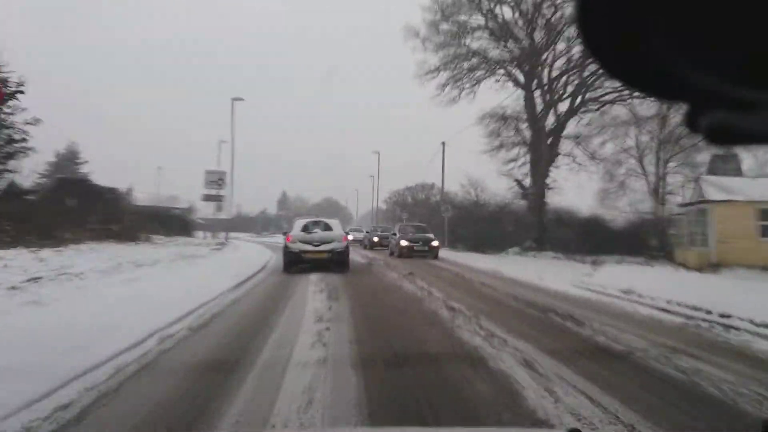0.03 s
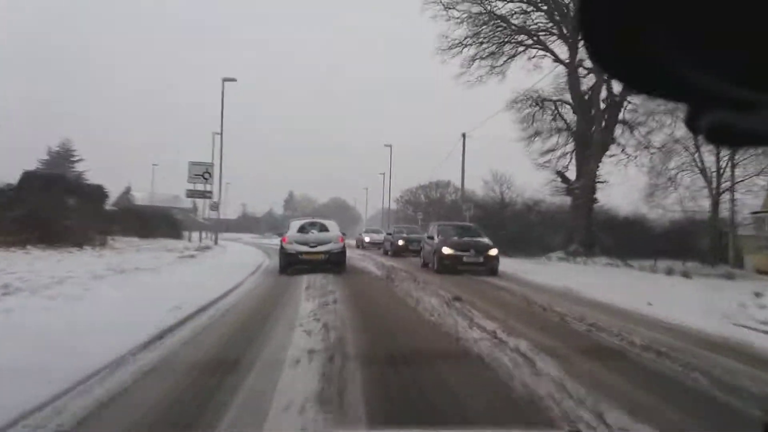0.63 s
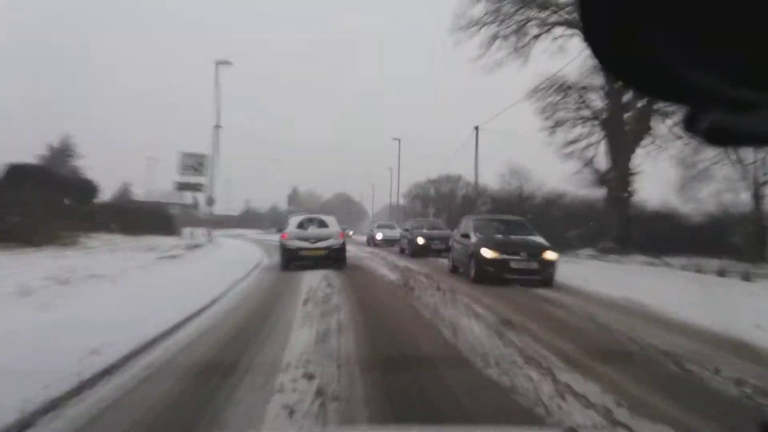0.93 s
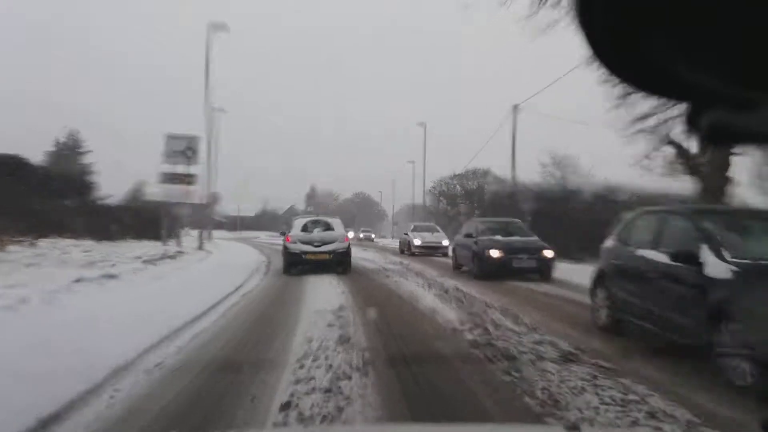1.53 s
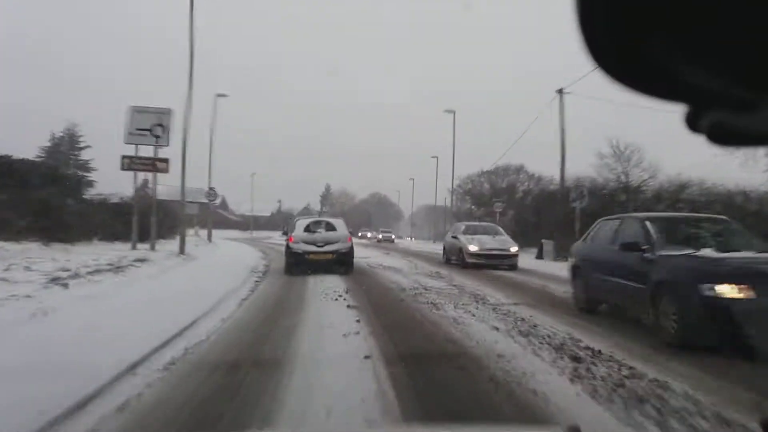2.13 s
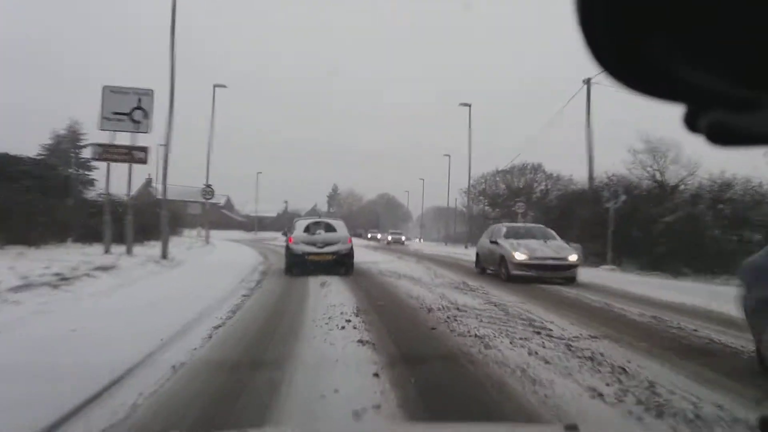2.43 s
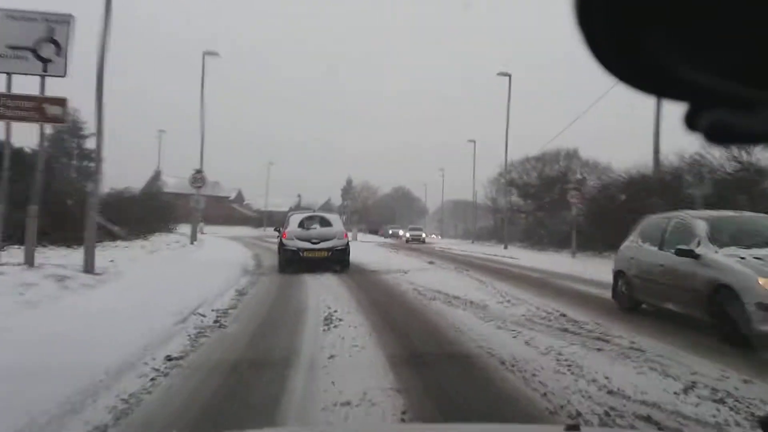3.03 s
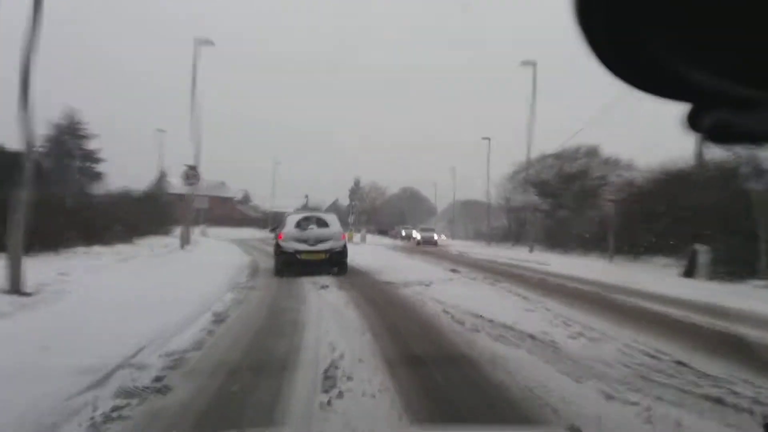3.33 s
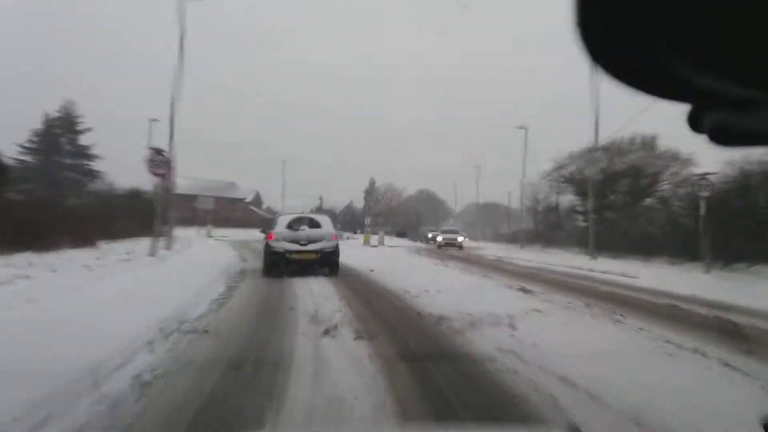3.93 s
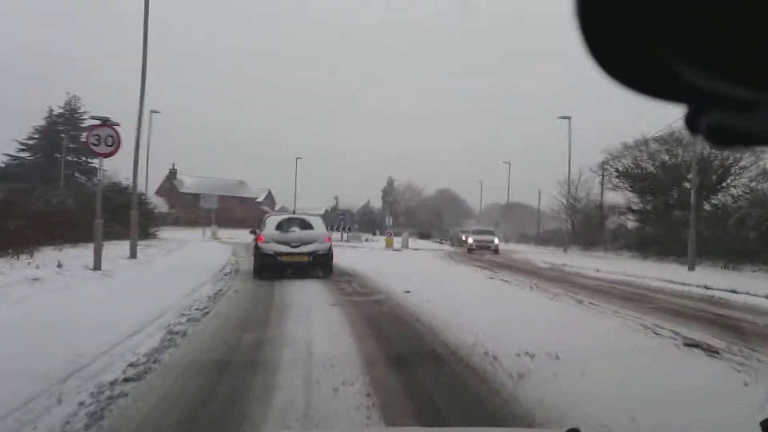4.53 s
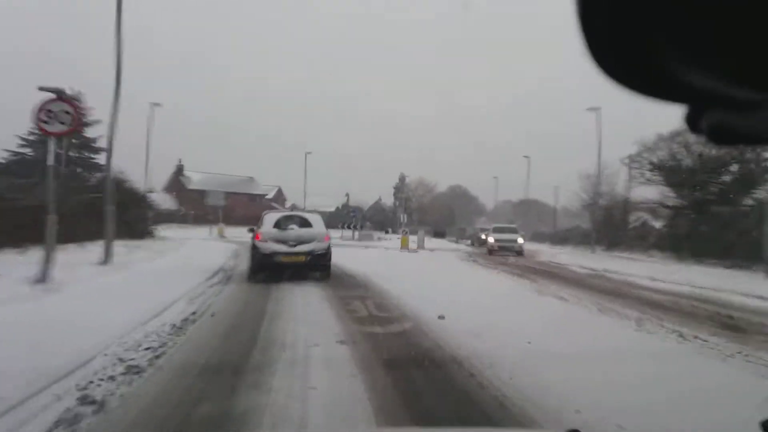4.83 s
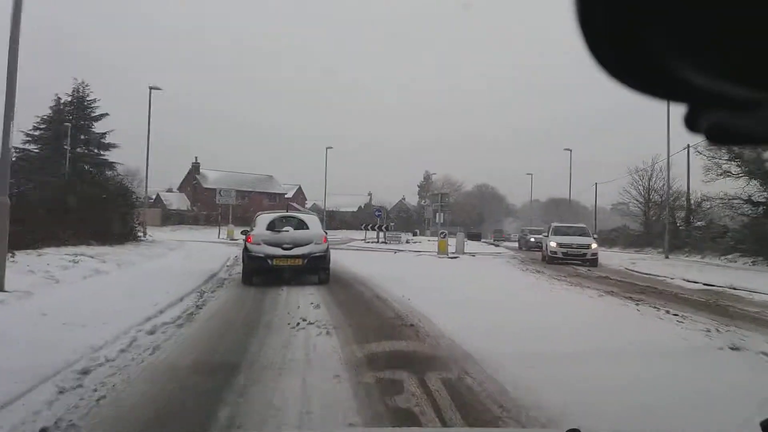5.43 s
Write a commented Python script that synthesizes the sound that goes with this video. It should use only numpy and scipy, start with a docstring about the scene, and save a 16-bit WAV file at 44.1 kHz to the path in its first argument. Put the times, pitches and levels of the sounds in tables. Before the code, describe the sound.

A steady low road rumble fills the cabin of a slow car, picked up from behind the windscreen. Tyres roar and hiss on wet snow over a low engine hum that gradually sinks. Early on a tyre swishes faintly through slush. A piece of trim rattles in light, rapid ticks that come and go, ruts add small booming swells, and late on there is a quick double plastic clack.

```python
"""Inside a car rolling slowly along a slushy road, the engine turning low and easing off. The road booms in the
body shell and drums on the panels; the tyres roar and hiss through the glass over a faint, steady high whine.
Engine firings throw a loose piece of trim against its seat in bouts of ticking. Slush swishes once near the
start; later a plastic fitting clacks twice."""
import sys
import numpy as np
from scipy import signal
from scipy.fft import rfft, irfft, next_fast_len
from scipy.io import wavfile
from scipy.ndimage import uniform_filter1d

SR = 44100
rng = np.random.default_rng(int(sys.argv[2]) if len(sys.argv) > 2 else 0)


def unload_audio(sound):
    """Save the sound as a 16-bit wav file, at the path given as the first command line argument."""
    columns = np.transpose(np.atleast_2d(sound))
    # keep every value between -1 and 1, then stretch to whole-number steps
    steps = np.round(np.clip(columns, -1, 1) * 32767)
    wavfile.write(sys.argv[1], SR, steps.astype(np.int16))


N = 245637
TIME_S = np.arange(N) / SR

# road roughness: time_s, boom_db, panel_db
ROAD_LEVELS = [(0, -24.0, -26), (0.42, -28.5, -29.5), (0.75, -20.5, -23), (1.22, -24.5, -28),
               (1.52, -20.5, -24.5), (1.85, -27, -25.5), (2.5, -28, -27.5), (3.4, -27.0, -26.0),
               (4.2, -29.5, -24), (4.55, -29.0, -28), (4.9, -27, -25), (5.57, -28.5, -26)]
# single ruts: time_s, boom_rise_db, panel_rise_db
RUT_JOLTS = [(.18, 7.5, 0.5), (.67, 0, 5.5), (3.16, 7, 1.5), (3.88, 7.5, 0), (4.93, 3.5, 5.5), (5.48, 0, 6)]
# shell boom: freq_hz, gain_db
SHELL_SPECTRUM = [(12, -51), (25, -33), (33, -26), (42, -9.5), (58, -1), (69, -7), (84, 0.5), (96, -10.5),
                  (120, -31), (200, -82.5)]
# panel drumming: freq_hz, gain_db
PANEL_SPECTRUM = [(60, -41), (82, -11), (95, 1), (110, -0.5), (135, -2.5), (153, 2), (175, -8.5),
                  (200, -17), (260, -34), (500, -70)]

# tyre roar: time_s, level_db
ROAR_LEVELS = [(0, -33), (0.4, -32.5), (1.5, -33.5), (2.5, -33.5), (3.3, -32.0), (3.8, -33.5), (4.5, -33.5),
               (5.57, -36)]
# tyre roar: freq_hz, gain_db
ROAR_SPECTRUM = [(120, -19.5), (200, 1.5), (235, -0.5), (270, 4.5), (310, -1), (355, 1), (420, -2.5),
                 (515, -4), (555, -8), (660, -5), (880, -9), (1250, -24), (2000, -27.5), (3200, -54.5)]
# tread and cabin resonances: centre_hz, width_hz, rise_db
TREAD_MODES = [(570, 12, -0.5), (787, 12, -2), (782, 68, 4), (851, 31, -5), (873, 12, 3), (1163, 66, 6),
               (1610, 76, 6.5), (1935, 100, 6)]
# faint high whine: time_s, level_db
HIGH_WHINE_LEVELS = [(0, -44), (1.2, -44.5), (1.7, -47), (2.7, -48), (3.3, -43), (3.8, -48), (4.3, -44.5),
                     (4.8, -43), (5.57, -54)]
# its narrow double resonance: freq_hz, gain_db
HIGH_WHINE_SPECTRUM = [(720, -50.5), (760, -10.5), (772, 3), (785, -5), (799, 7), (812, -14), (860, -51)]
# spray under the car: time_s, level_db
SPRAY_LEVELS = [(0, -49.5), (1, -48), (1.5, -50), (2.6, -49.5), (3.7, -50.5), (4.8, -51), (5.2, -53),
                (5.57, -52.5)]
# spray hiss: freq_hz, gain_db
SPRAY_SPECTRUM = [(900, -2), (1550, 7.5), (2050, 1.5), (2400, -1), (3400, -5.5), (4100, -9.5), (5200, -15),
                  (7400, -21), (8100, -27), (10000, -33), (16000, -51)]

# engine speed: time_s, firing_hz
FIRING_RATE = [(0.0, 45.66), (0.5, 44.78), (1.0, 44.37), (1.5, 44.03), (2.2, 43.45), (3.0, 42.94),
               (3.8, 42.4), (4.5, 41.45), (5.57, 40.71)]
# engine drone: firing_multiple, level_db
DRONE_ORDERS = [(1, -45), (2, -37.5), (3, -38), (4, -45), (6, -50), (8, -50.5)]
# gear whine: time_s, level_db
WHINE_LEVELS = [(0, -46.5), (1.5, -51), (3.3, -49), (4, -62), (5.57, -65)]

# trim rattling: start_s, length_s, relative_db
RATTLE_BOUTS = [(0, 0.076, -56), (0.204, .07, -64), (.63, 0.026, -60), (0.716, .18, -59),
                (0.998, 0.072, -55.5), (1.17, 0.059, -64), (1.327, 0.026, -64.5), (1.53, .15, -61.5),
                (1.682, 0.44, -56.5), (2.256, 0.11, -57.5), (2.39, 0.59, -59), (2.75, 0.79, -56.5),
                (3.48, 0.3, -60.5), (3.816, 1.16, -57.5), (5.198, 0.036, -68)]
# plain trim click: freq_hz, gain_db
TICK_SPECTRUM = [(1500, -27), (3000, 2.5), (4000, 1.5), (4900, 5), (5600, -0.5), (7400, 1), (8200, -3),
                 (9000, 0.5), (10400, -2), (11300, -0.5), (12900, 0), (13500, -5), (14600, -7),
                 (15600, -0.5)]
# trim resonances: centre_hz, width_hz, rise_db
TICK_MODES = [(3917, 124, 12), (4710, 200, 5.5), (6340, 400, 6), (7010, 340, 4.5), (7370, 590, 8),
              (11160, 360, 3), (13000, 460, 2.5)]
# treble of the ticks: time_s, gain_db
TICK_TREBLE_GAINS = [(0, -0.5), (2.5, 0), (3.3, 1), (4.4, 2), (5.57, -2.5)]

# fitting knocks, the first two merging: time_s, level_db, t60_s, tilt_db_per_octave
KNOCKS = [(4.5139, -40, 0.064, -2), (4.523, -42, 0.042, -5.5), (4.583, -36, 0.055, 0)]
# plastic fitting: freq_hz, gain_db
FITTING_SPECTRUM = [(600, -18), (1500, -5), (2300, -6), (3300, 2), (4200, -8), (4900, -5), (6000, -10),
                    (7100, -9), (8300, -19), (10400, -8), (12000, -19), (16000, -17)]
# slush swish: freq_hz, gain_db
SLUSH_SPECTRUM = [(1500, -20), (4000, -4), (6000, -9), (7300, -3), (8300, -10), (11500, -7), (15500, -12)]


def body(ridges_per_s=16, rut_half_width_s=0.033):
    """Ruts heave the shell in a deep boom; smaller ridges drum on floor and door panels."""
    boom_db = curve(ROAD_LEVELS) + 0.9 * walk(ridges_per_s) - 1.27
    panel_db = curve(ROAD_LEVELS, column=2) + 1.32 * walk(ridges_per_s) - 0.4
    for time_s, boom_rise_db, panel_rise_db in RUT_JOLTS:
        jolt = np.exp(-((TIME_S - time_s) / rut_half_width_s) ** 2)
        boom_db += boom_rise_db * jolt
        panel_db += panel_rise_db * jolt
    boom = steady_noise(SHELL_SPECTRUM, window_samples=5000) * undb(boom_db)
    drumming = steady_noise(PANEL_SPECTRUM, window_samples=5000) * undb(panel_db)
    return boom + drumming


def tyres():
    """The tread roars through the cabin's resonances; a faint steady whine sits near 800 Hz; wet snow hisses."""
    roar = noise(ROAR_SPECTRUM, TREAD_MODES) * undb(curve(ROAR_LEVELS) + 0.5 * walk(20) - 0.1)
    high_whine = steady_noise(HIGH_WHINE_SPECTRUM, window_samples=3000) * undb(curve(HIGH_WHINE_LEVELS))
    spray = noise(SPRAY_SPECTRUM) * undb(curve(SPRAY_LEVELS) + 1.1 * walk(45))
    return roar + high_whine + spray


def engine(firings, whine_order=14.5):
    """Low orders of the firing rate waver with load; a faint gear whine sinks with engine speed."""
    drone = sum(tone(round(order) * firings, db + 3.8 * walk(6)) for order, db in DRONE_ORDERS)
    whine_cycles = whine_order * firings + 0.074 * walk(9)
    whine_db = curve(WHINE_LEVELS) + 1.1 * walk(8.82)
    return drone + tone(whine_cycles, whine_db)


def trim(firings, treble_hz=8540):
    """Each firing throws loose trim against its seat: graze, sharp contact, short reflections."""
    timing_draw, level_draw = rng.standard_normal((400, 2))[firings.astype(int)].T  # one pair a firing
    since_contact_s = firings % 1 / curve(FIRING_RATE) - 0.0016 - 0.00013 * timing_draw
    graze = undb(-5) * np.exp(-((since_contact_s + 0.0014) / 0.00046) ** 2)
    contact = np.exp(-(since_contact_s / 0.00032) ** 2)
    reflections = undb(-10.5) * fade(since_contact_s, t60_s=0.036)
    scuffs = rng.choice([-1, 1], N) * np.sqrt(graze ** 2 + contact ** 2 + reflections ** 2)
    ticks = unit(colour(scuffs, TICK_SPECTRUM, TICK_MODES))
    treble = signal.sosfiltfilt(highpass(4, treble_hz), ticks)
    ticks += treble * (undb(curve(TICK_TREBLE_GAINS)) - 1)
    rattle_db = chatter_db()
    scatter_db = np.interp(rattle_db, [-68, -59], [3, 1.1])  # light contact ticks unevenly
    return ticks * undb(rattle_db + scatter_db * level_draw + 2.5)


def chatter_db():
    """Strength of the trim's rattle: bouts start fast, hold, and settle more slowly when long."""
    level_db = np.full(N, -76.0)  # between bouts the trim only brushes its seat
    for start_s, length_s, bout_db in RATTLE_BOUTS:
        fall_db_per_s = np.interp(length_s, [0, 1], [200, 60])
        shape_db = swell_db(start_s, length_s, rise_db_per_s=500, fall_db_per_s=fall_db_per_s)
        level_db = np.maximum(level_db, bout_db + shape_db)
    return level_db


def fitting(slip_s=0.0084, rms_window_s=0.02):
    """A plastic fitting slips for an instant, knocks against its stop and dies at once."""
    clacks = np.zeros(N)
    for time_s, level_db, t60_s, tilt_db_per_octave in KNOCKS:
        force = np.maximum(fade(TIME_S - time_s, t60_s), fade(time_s - TIME_S, slip_s))
        impact = rng.standard_normal(N) * force
        knock = colour(impact, FITTING_SPECTRUM, tilt_db_per_octave=tilt_db_per_octave)
        knock = signal.sosfilt(highpass(2, cutoff_hz=550), knock)
        knock_rms = np.sqrt(np.sum(knock ** 2) / (SR * rms_window_s))
        clacks += undb(level_db) * knock / knock_rms
    return clacks


def slush(level_db=-53):
    """A tyre cuts through a ridge of slush: a swish that swells and stops short."""
    shape_db = swell_db(peak_s=0.488, hold_s=0.069, rise_db_per_s=80, fall_db_per_s=550)
    return noise(SLUSH_SPECTRUM) * undb(level_db + shape_db + 1.8 * walk(140))


def undb(db):
    """Decibels to gain."""
    return 10 ** (np.asarray(db) / 20)


def unit(x):
    """Scale to rms 1."""
    return x / np.sqrt(np.mean(x ** 2))


def curve(rows, column=1):
    """One column of a time table, joined by straight lines."""
    rows = np.asarray(rows)
    return np.interp(TIME_S, rows[:, 0], rows[:, column])


def highpass(order, cutoff_hz):
    """High-pass filter sections."""
    return signal.butter(order, cutoff_hz, "high", fs=SR, output="sos")


def colour(x, spectrum, modes=(), tilt_db_per_octave=0):
    """Causal filter with a given spectrum, resonances and tilt."""
    size = next_fast_len(len(x) + 8192) * 2
    hz = np.maximum(np.fft.rfftfreq(size, 1 / SR), 1)
    points_hz, points_db = np.asarray(spectrum).T
    gain_db = np.interp(np.log(hz), np.log(points_hz), points_db)
    gain_db += tilt_db_per_octave * np.log2(np.maximum(hz / points_hz[0], 1))
    for centre_hz, width_hz, rise_db in modes:
        gain_db += rise_db / (1 + (2 * (hz - centre_hz) / width_hz) ** 2)
    # folded cepstrum: each resonance rings after its cause
    cepstrum = irfft(np.log(undb(gain_db)))[:size // 2]
    cepstrum[1:] *= 2
    response = np.exp(rfft(cepstrum, size))
    return irfft(rfft(x, size) * response)[:len(x)]


def noise(spectrum, modes=()):
    """Coloured noise of rms 1."""
    return unit(colour(rng.standard_normal(N), spectrum, modes))


def steady_noise(spectrum, window_samples):
    """Coloured noise divided by its running rms."""
    raw = noise(spectrum)
    return raw / np.sqrt(uniform_filter1d(raw ** 2, size=window_samples))


def walk(rate_hz):
    """Slewed random steps of rms 1."""
    hold_samples = max(int(SR / rate_hz), 1)
    steps = np.repeat(rng.standard_normal(N // hold_samples + 1), hold_samples)[:N]
    return unit(uniform_filter1d(steps, hold_samples))


def tone(cycles, rms_db):
    """Sine with a random starting phase."""
    return undb(rms_db) * np.sqrt(2) * np.sin(2 * np.pi * (cycles + rng.random()))


def fade(age_s, t60_s):
    """Exponential decay from age 0, silent before."""
    return (age_s >= 0) * np.exp(-np.log(1000) * np.maximum(age_s, 0) / t60_s)


def swell_db(peak_s, hold_s, rise_db_per_s, fall_db_per_s):
    """Attack, hold at 0 dB, release."""
    before_s = np.maximum(peak_s - TIME_S, 0)
    after_s = np.maximum(TIME_S - peak_s - hold_s, 0)
    return -rise_db_per_s * before_s - fall_db_per_s * after_s


def scene():
    """Mono mix behind the windscreen; engine and trim share one firing count."""
    firings = 0.255 + np.cumsum(curve(FIRING_RATE)) / SR
    return (body() + engine(firings) + tyres() + trim(firings) + slush() + fitting())[None]


def record(dry, low_hz=36, top_hz=15800):
    """Cut the deepest bass and the highest treble."""
    thinned = signal.sosfilt(highpass(6, low_hz), dry)
    return signal.sosfilt(signal.ellip(10, 0.2, 80, top_hz, fs=SR, output="sos"), thinned)


dry = scene()
out = record(dry)
unload_audio(out)
```